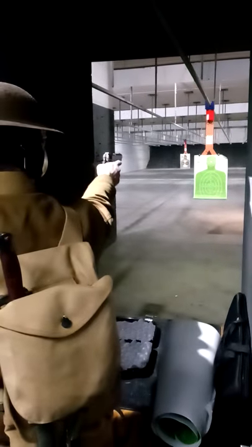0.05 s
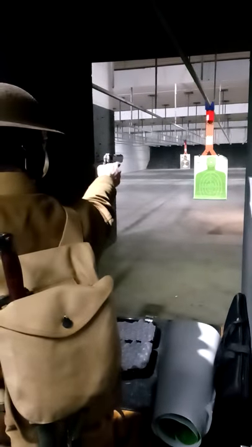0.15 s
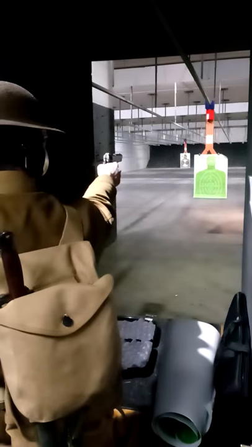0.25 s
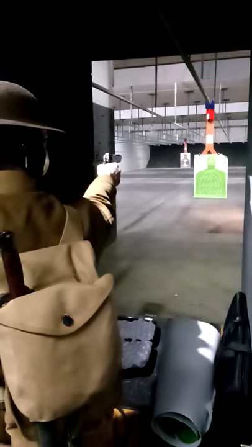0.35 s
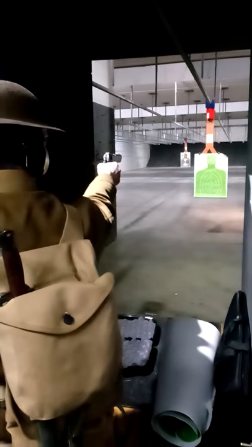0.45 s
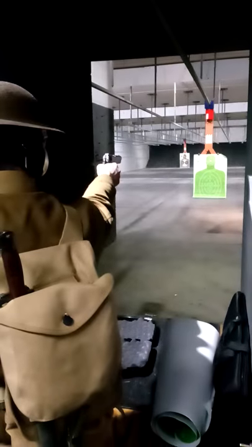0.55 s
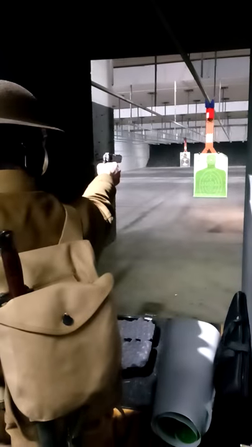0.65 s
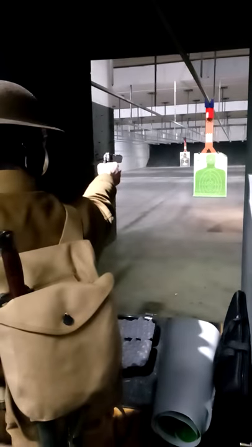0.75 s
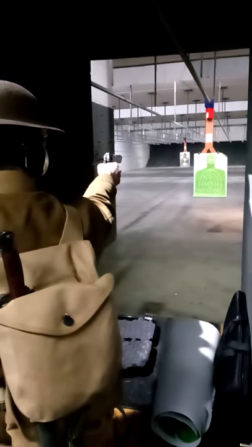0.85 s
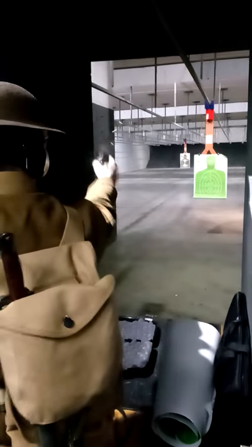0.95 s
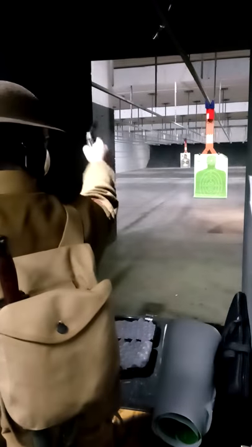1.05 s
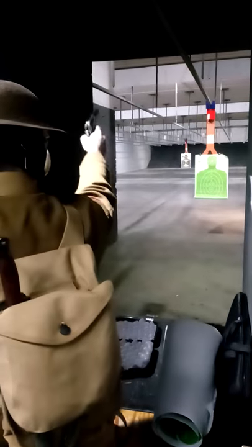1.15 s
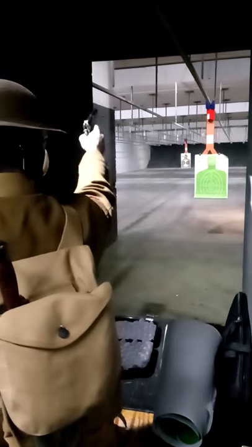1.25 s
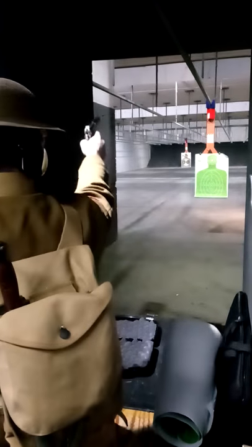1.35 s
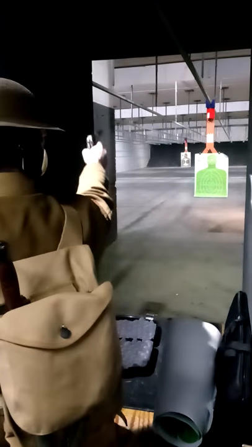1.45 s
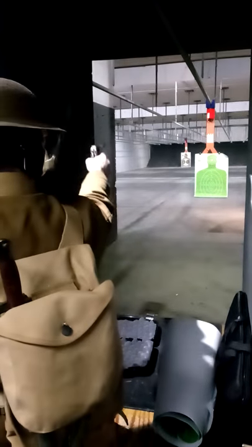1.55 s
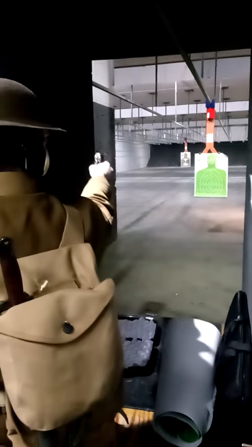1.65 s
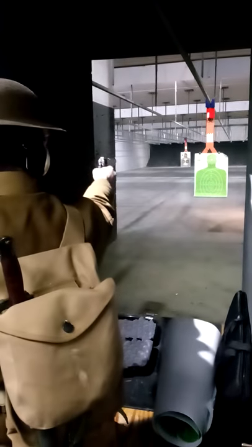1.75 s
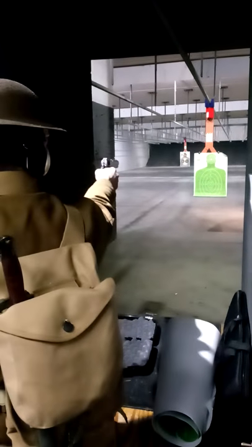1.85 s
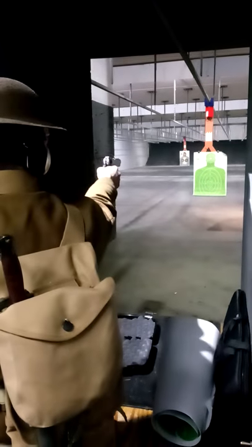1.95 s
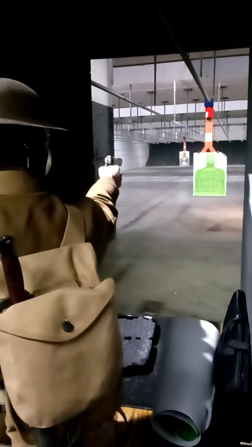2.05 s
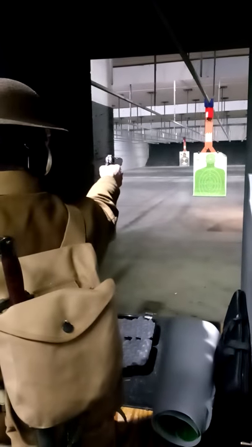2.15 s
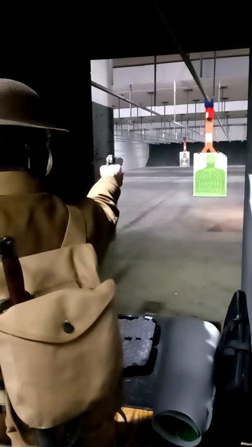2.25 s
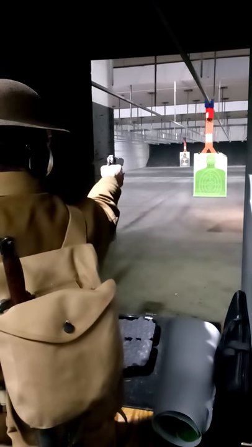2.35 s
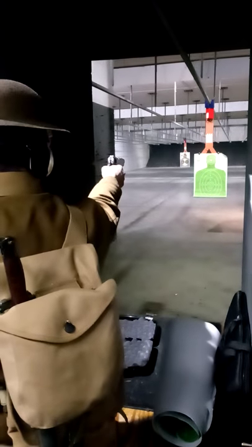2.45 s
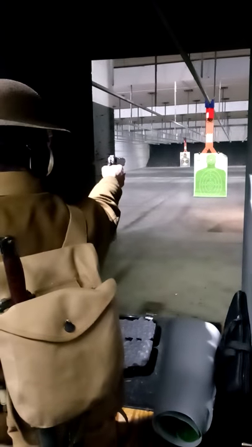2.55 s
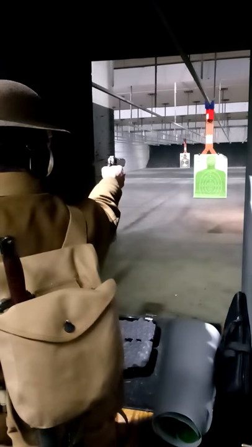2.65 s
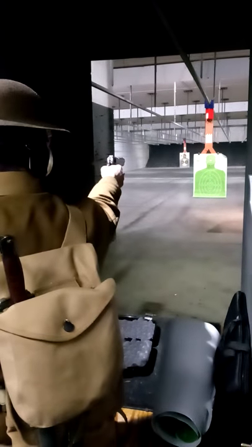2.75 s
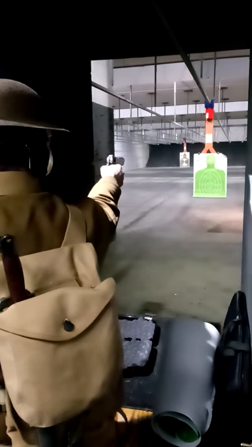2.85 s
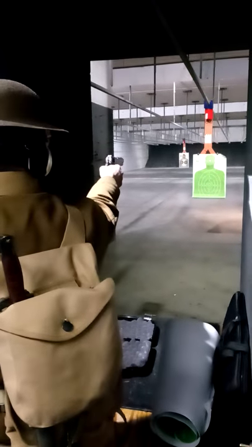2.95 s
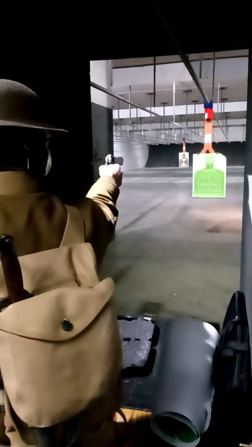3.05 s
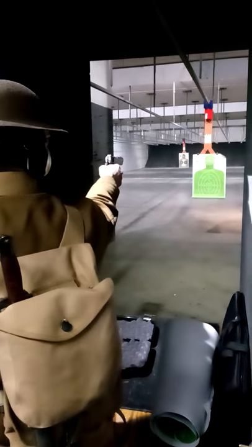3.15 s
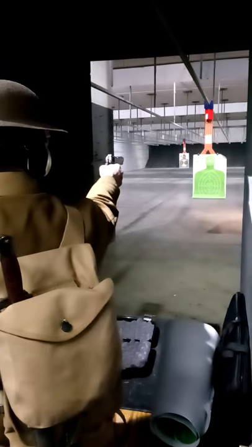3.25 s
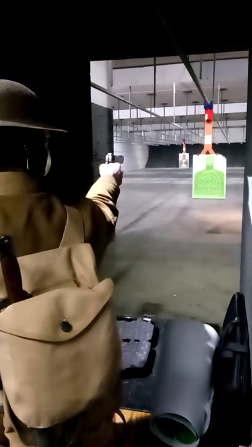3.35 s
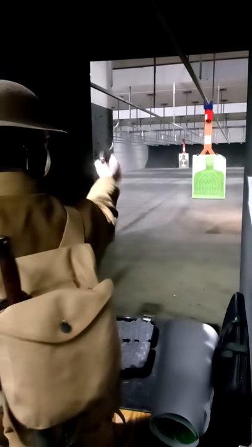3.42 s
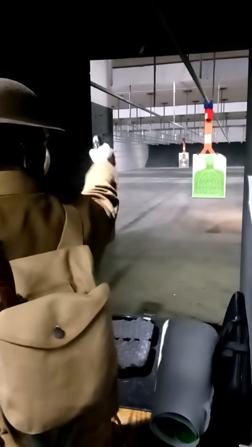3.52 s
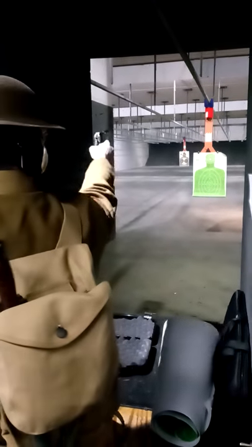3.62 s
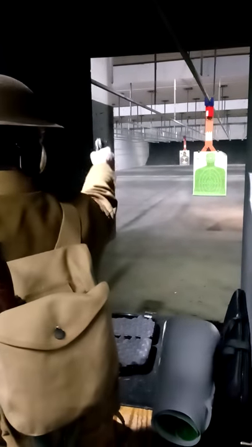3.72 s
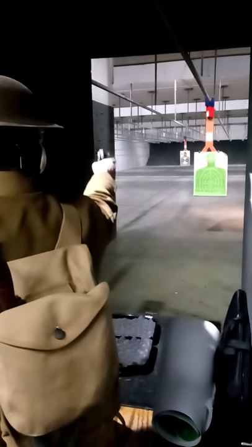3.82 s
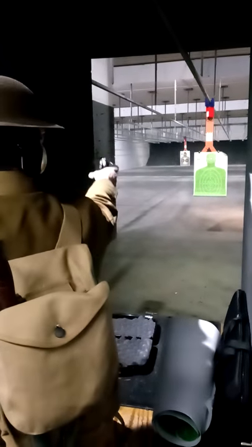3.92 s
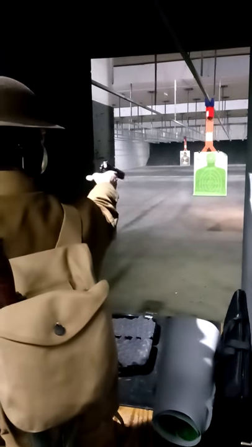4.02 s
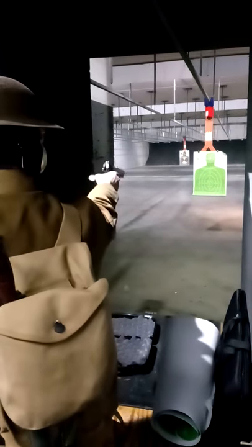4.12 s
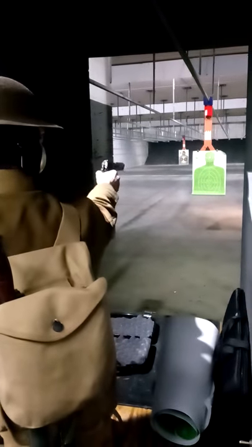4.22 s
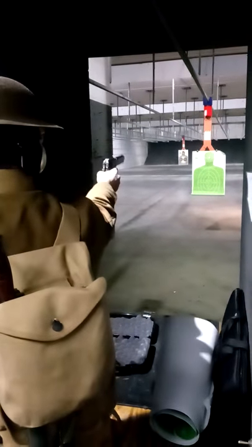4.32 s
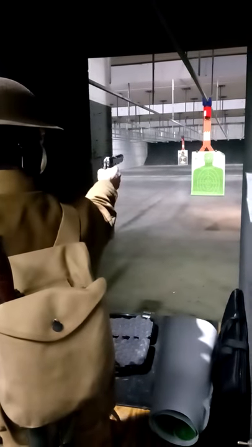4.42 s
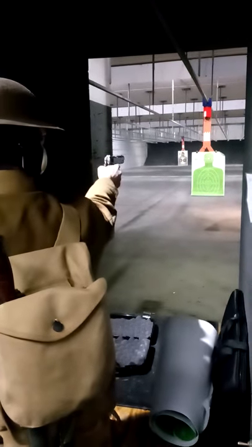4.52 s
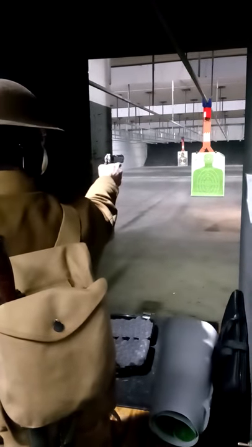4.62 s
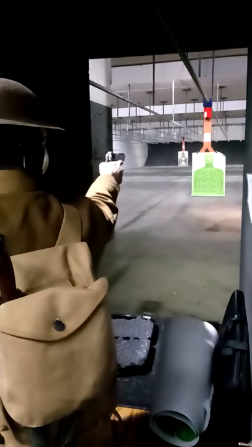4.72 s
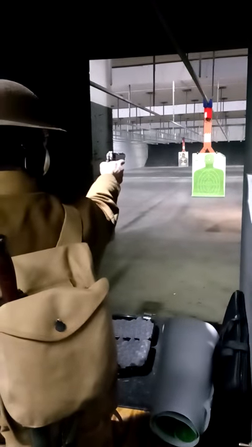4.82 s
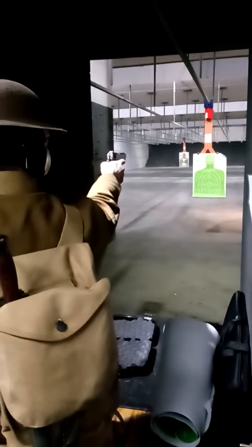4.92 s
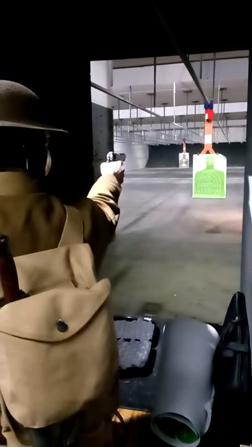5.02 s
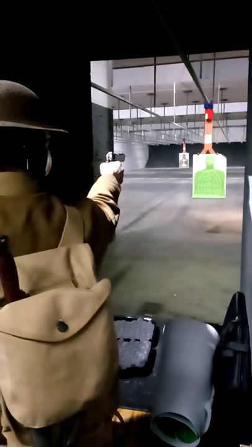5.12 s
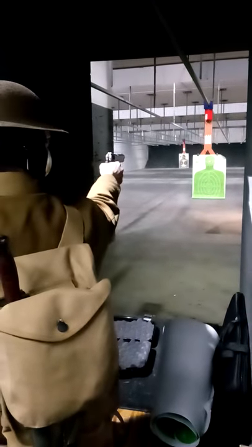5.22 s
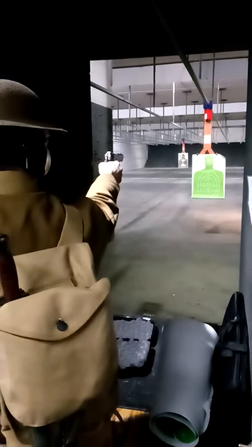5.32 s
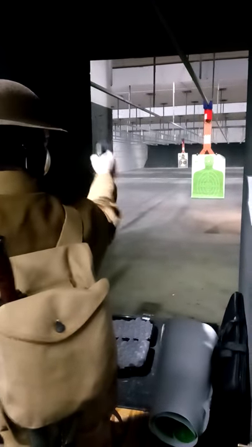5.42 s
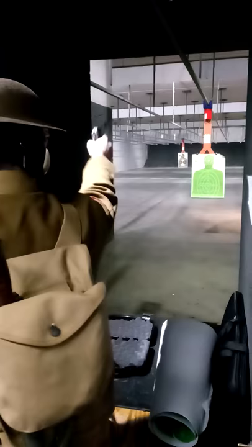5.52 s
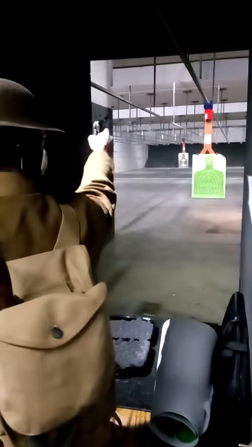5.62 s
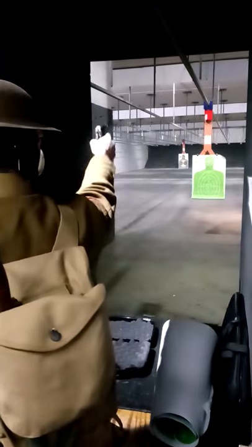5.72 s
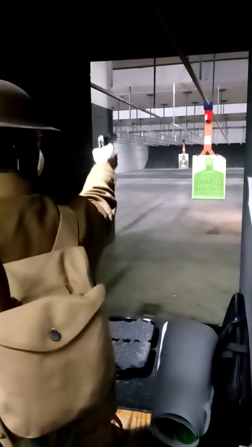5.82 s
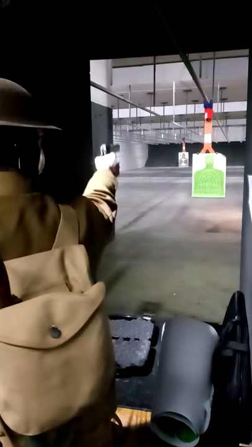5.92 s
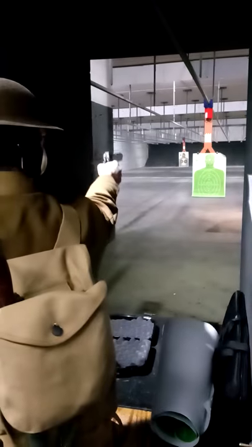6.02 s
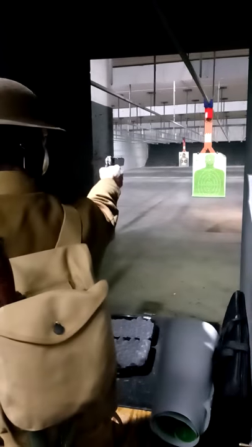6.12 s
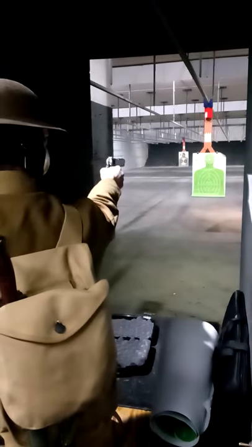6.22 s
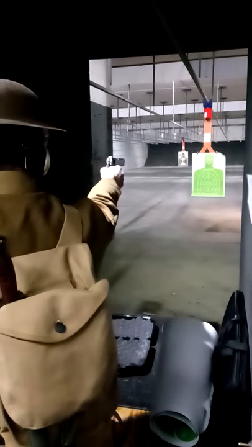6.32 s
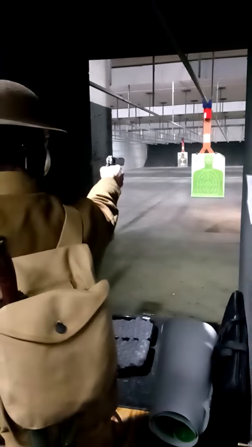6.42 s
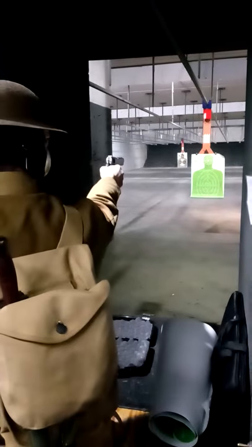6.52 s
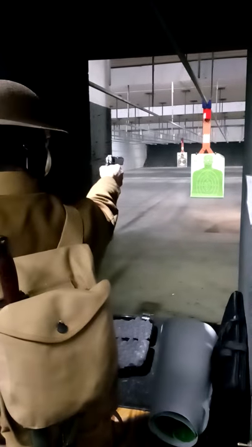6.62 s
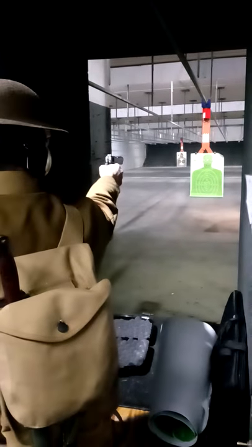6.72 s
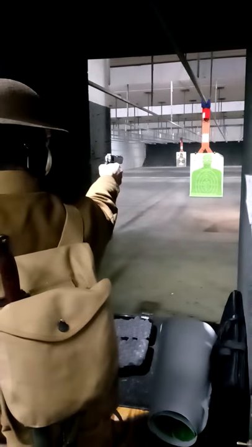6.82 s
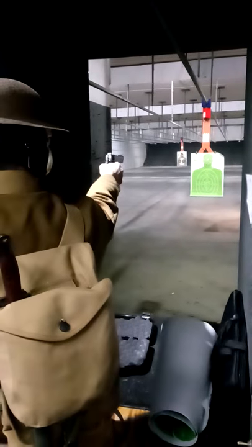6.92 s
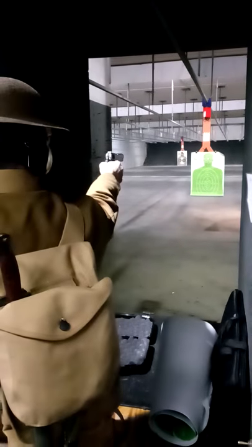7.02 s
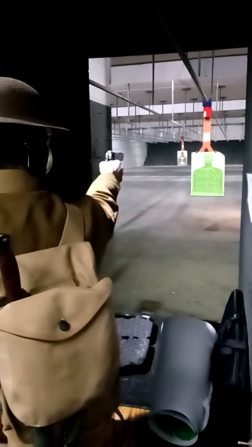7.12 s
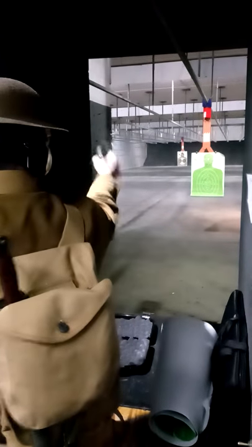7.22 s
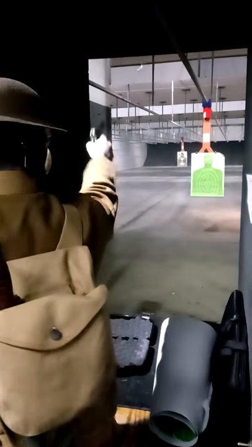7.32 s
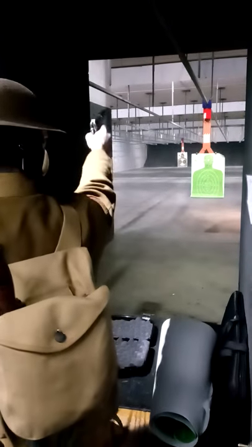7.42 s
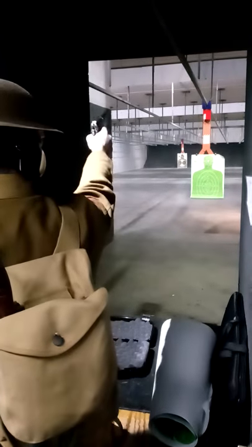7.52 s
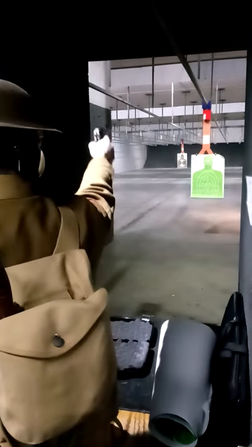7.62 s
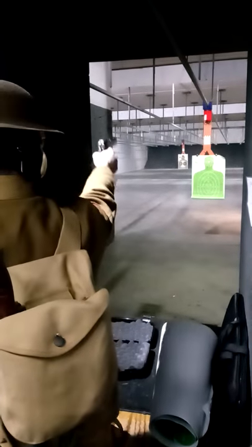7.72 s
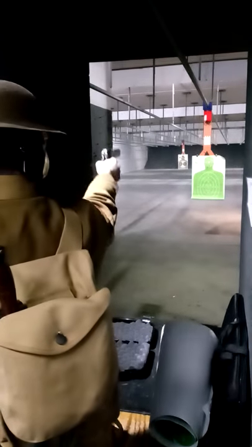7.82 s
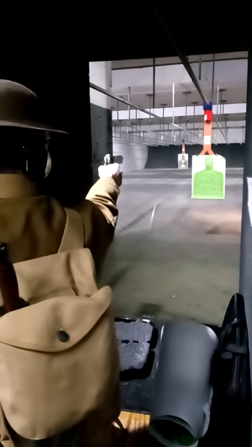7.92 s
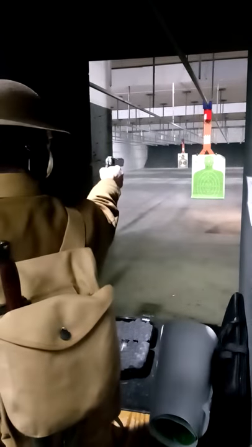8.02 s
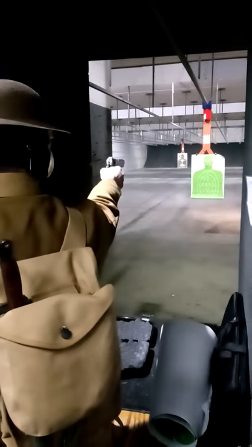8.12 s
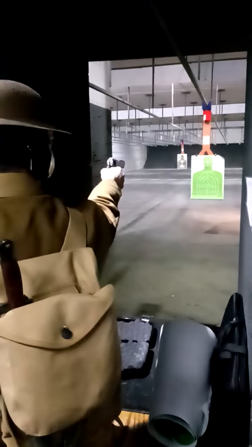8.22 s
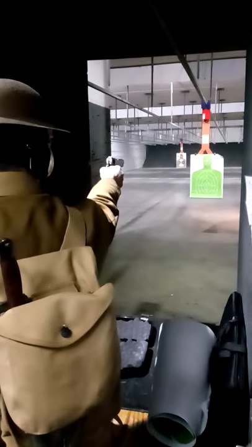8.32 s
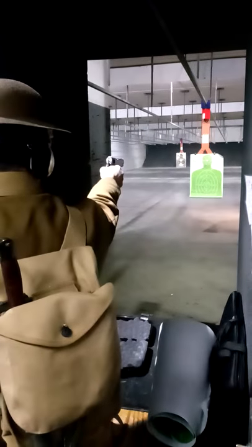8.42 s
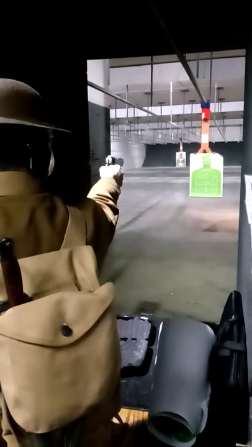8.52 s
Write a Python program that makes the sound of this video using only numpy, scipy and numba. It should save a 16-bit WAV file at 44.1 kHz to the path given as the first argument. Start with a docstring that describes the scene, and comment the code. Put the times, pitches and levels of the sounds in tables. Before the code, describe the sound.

Ventilation rushes low in an indoor shooting range, then a handgun close to the microphone fires four times at a steady pace. Every blast clips and briefly chokes the sound, followed by a deep thump and echoes rolling off hard walls. Other shooters, some next door and some distant, fill the gaps with their own echoing shots, along with small gun handling clicks and the light ring of brass landing.

```python
"""Ventilation rushes in a concrete indoor range; then a pistol fires four shots at arm's length.
Each muzzle blast cracks and its echoes pile up into a long roar. Other lanes fire in between,
spent brass ticks on the floor and gun parts click. Gain control rides the roar, the input clips,
and each close blast stalls the small microphone for a moment."""
import sys
import numpy as np
from scipy import signal
from scipy.fft import rfft, irfft, next_fast_len
from scipy.io import wavfile
from scipy.ndimage import map_coordinates
from numba import njit

SR = 44100
rng = np.random.default_rng(int(sys.argv[2]) if len(sys.argv) > 2 else 0)


def output_pcm(signal):
    """Save a mono or channel-first signal as 16-bit PCM at the path in sys.argv[1].

    Samples are clipped to [-1, 1] before scaling.
    """
    pcm = np.clip(np.atleast_2d(signal).T, -1, 1) * 32767
    wavfile.write(sys.argv[1], SR, np.round(pcm).astype(np.int16))


N = 377496

# noise spectra (frequency [Hz], density [dB])
DUCT_SPECTRUM = [(25, -7.5), (45, -18.5), (76, 0.5), (112, -4.5), (150, -0.5), (280, -11.5), (620, -15),
                 (1700, -12), (2600, -21), (4300, -28.5), (5600, -34.5), (6800, -56), (15000, -75.5)]
CLICK_SPECTRUM = [(500, -21.5), (2500, -17.5), (5000, 6.5), (7000, -2.5), (11000, -31), (16000, -44.5)]
SWELL_SPECTRUM = [(30, -34), (100, -17.5), (250, -14.5), (600, -7.5), (1300, -10.5), (1900, -8.5),
                  (2700, -11), (3600, -15.5), (5000, -11), (6500, -18), (16000, -56.5)]  # far shots
BLAST_SPECTRUM = [(30, -25), (100, -9), (250, -12.5), (800, 10), (1500, -2.5), (3300, -0.5), (5000, -9),
                  (7000, -11.5), (16000, -31)]  # muzzle gas, early reflections
ROAR_SPECTRUM = [(25, -14.5), (55, -23), (95, -4), (150, -8), (210, -4), (420, 0.5), (800, 0.5), (1050, -2),
                 (1400, -10.5), (2100, -12), (2700, -12), (3500, -13.5), (5000, -12.5), (6500, -17),
                 (16000, -54)]  # late echoes
BOOM_SPECTRUM = [(20, -2), (45, -4), (85, 2.5), (140, -10.5), (400, -47.5), (2000, -99.5)]  # deep thump after a shot
# hall decay (frequency [Hz], T60 [s])
HALL_DECAY = [(60, 2.09), (200, 1.724), (450, 1.843), (850, 1.67), (1500, 1.363), (2600, 1.31),
              (3800, 1.01), (5200, 0.72), (10000, 0.46)]
# booth and lane resonances (centre [Hz], width [Hz], lift [dB])
BOOTH_MODES = [(88, 15, -1), (309.5, 4.3, 4.5), (441, 4, 8), (817, 81, 1), (2670, 300, 3.5), (3390, 21, 6),
               (3730, 46, 3), (4120, 19, -3), (4490, 11, 5)]
# gun handling (time [s], level [dB], ring [Hz])
GUN_CLICKS = [(2.856, -17, 5320), (4.273, -13, 4800), (5.362, -22.5, 5300), (7.991, -17.5, 5630),
              (8.155, -7.5, 2680)]
# spent cases landing (time [s], level [dB])
CASE_DROPS = [(4.735, -2), (6.421, -9.5)]
# ring of a case (frequency [Hz], level [dB], T60 [s])
BRASS_MODES = [(6700, -2, 0.24), (11450, -28, .12)]
# shots far down the line (time [s], level [dB], swell time [s])
FAR_SHOTS = [(1.89, 41, 0.2), (6.66, 34, 0.28)]
# shots in the next lane (time [s], roar [dB], boom [dB])
NEXT_SHOTS = [(1.397, 42.5, 37), (2.884, 36, 11), (4.290, 37.5, 25), (7.032, 39.5, 10)]
# close shots (time [s], crack length [s], time the microphone comes free [s])
PISTOL_SHOTS = [(1.0027, .0011, 1.1475), (3.4735, .0022, 3.5944), (5.4551, .0011, 5.6087),
                (7.2685, .0016, 7.4205)]
# microphone response (frequency [Hz], gain [dB])
MIC_RESPONSE = [(30, -1.5), (3000, 2), (5000, -0.5), (6700, -8), (10000, 2.5), (16000, 1.5)]


def amp(db):
    """Decibels to gain."""
    return 10 ** (np.asarray(db) / 20)


def unit(x):
    """Scale to rms 1."""
    return x / np.sqrt(np.mean(x ** 2) + 1e-20)


def along(points, hz):
    """Interpolate (frequency [Hz], value) points on a log axis."""
    knots_hz, values = np.transpose(points)
    return np.interp(np.log(hz + 1), np.log(knots_hz + 1), values)


def since(at_s):
    """Seconds since at_s, zero before."""
    return np.maximum(np.arange(N) / SR - at_s, 0)


def add(track, at_s, sound):
    """Mix sound into track from at_s."""
    part = track[round(at_s * SR):][:len(sound)]
    part += sound[:len(part)]


def filtered(x, response):
    """Apply a gain given as a function of Hz."""
    size = next_fast_len(len(x) + 8192)
    return irfft(rfft(x, size) * response(np.fft.rfftfreq(size, 1 / SR)), size)[:len(x)]


def noise(spectrum, size):
    """Coloured noise, rms 1."""
    return unit(filtered(rng.standard_normal(size), lambda hz: amp(along(spectrum, hz))))


def resonance(x, centre_hz, width_oct, order):
    """One band of x, rms 1."""
    return unit(filtered(x, lambda hz: 1 / (1 + (np.log2((hz + 1) / centre_hz) / width_oct) ** order)))


def wobble(rate_hz, size):
    """Smooth random curve."""
    knots = rng.standard_normal(int(size * rate_hz / SR) + 4)
    return map_coordinates(knots, [np.arange(size) * rate_hz / SR])


def bump(t, width_s, at_s=0):
    """Gaussian, peak 1."""
    return np.exp(-((t - at_s) / width_s) ** 2)


def ventilation(level_db=-26.5):
    """Steady rush of duct air, no fine hiss."""
    return amp(level_db) * noise(DUCT_SPECTRUM, N)


def strike(ring, t, click_t60_s=0.08, rebound_s=0.031, rebound_db=-14.5):
    """Metal contact: a click plus the part's ring, then a weaker rebound."""
    contact = lambda: noise(CLICK_SPECTRUM, len(t)) * amp(-60 * t / click_t60_s) + ring()
    sound = contact()
    add(sound, rebound_s, amp(rebound_db) * contact())
    return sound


def gun_handling(width_oct=0.25, snap_db=3, snap_t60_s=0.07):
    """Parts snap into place; the hand damps them to a short, broad ring."""
    out, t = np.zeros(N), np.arange(SR // 2) / SR
    decay = amp(snap_db - 60 * t / snap_t60_s)
    for at_s, db, ring_hz in GUN_CLICKS:
        ring = lambda: resonance(rng.standard_normal(len(t)), ring_hz, width_oct, order=4) * decay
        add(out, at_s, amp(db) * strike(ring, t))
    return out


def spent_cases(detune=0.005):
    """Brass hits concrete; each mode is a close pair, so the ring beats."""
    out, t = np.zeros(N), np.arange(SR // 2) / SR
    split = lambda hz: hz * (1 + detune * rng.standard_normal(2))
    pair = lambda centre_hz: sum(np.sin(2 * np.pi * hz * t) for hz in split(centre_hz)) / 2
    ring = lambda: sum(amp(db - 60 * t / t60_s) * pair(hz) for hz, db, t60_s in BRASS_MODES)
    for at_s, db in CASE_DROPS:
        add(out, at_s, amp(db) * strike(ring, t))
    return out


def booth_gain(hz):
    """Booth and lane resonances colour the echoes."""
    return amp(sum(db / (1 + (2 * (hz - mode_hz) / width_hz) ** 2)
                   for mode_hz, width_hz, db in BOOTH_MODES))


def hall(spectrum, size=3 * SR, clump_db=0.77, clump_hz=25, wall_db=3):
    """Echoes of one shot arrive in clumps; the far wall returns a swell; treble dies first."""
    echoes = unit(filtered(noise(spectrum, size), booth_gain))
    echoes *= amp(clump_db * wobble(clump_hz, size))
    hz, t, bins = signal.stft(echoes, SR, nperseg=512)
    level_db = wall_db * bump(t, width_s=0.18, at_s=0.42) - 60 * t / along(HALL_DECAY, hz)[:, None]
    return signal.istft(bins * amp(level_db), SR, nperseg=512)[1][:size]


def boom(t, rise_s=0.016, t60_s=1.0):
    """A deep, low thump swells just after the shot and dies away."""
    return noise(BOOM_SPECTRUM, len(t)) * (1 - bump(t, rise_s)) * amp(-60 * t / t60_s)


def far_lane(high_hz=2650, low_hz=1800, sink_s=0.45, ring_db=3, ring_t60_s=0.64,
             rise_db=52, hiss_db=-14, hiss_t60_s=0.39, end_wall_db=3.5):
    """Far shots: thin hiss, then a swell with a sinking steely ring; the end wall returns it."""
    out, t = np.zeros(N), np.arange(3 * SR) / SR
    steel = lambda hz: resonance(noise(SWELL_SPECTRUM, len(t)), hz, width_oct=0.29, order=2)
    high_share = bump(t, sink_s)
    end_wall = amp(end_wall_db * bump(t, width_s=0.063, at_s=0.33))
    onset = 1 - np.exp(-t / 0.0045)
    for at_s, db, swell_s in FAR_SHOTS:
        ring = high_share * steel(high_hz) + np.sqrt(1 - high_share ** 2) * steel(low_hz)
        ring *= amp(ring_db - 60 * t / ring_t60_s)
        rise = amp(-rise_db * np.maximum(1 - t / swell_s, 0) ** 2.15)
        hiss = noise(CLICK_SPECTRUM, len(t)) * amp(hiss_db - 60 * t / hiss_t60_s)
        swell = amp(db) * (hall(SWELL_SPECTRUM, wall_db=1) + ring) * rise * end_wall
        add(out, at_s, (swell + hiss) * onset)
    return out


def next_lane(build_s=0.0087, early_t60_s=0.31, side_wall_db=3.5):
    """The partition blocks the direct blast; bright reflections build, then merge into the roar."""
    out, t = np.zeros(N), np.arange(3 * SR) / SR
    arrival = 1 - np.exp(-t / build_s)
    side_wall = amp(side_wall_db * bump(t, width_s=0.065, at_s=0.11))  # second surge
    for at_s, roar_db, boom_db in NEXT_SHOTS:
        early_db = 48.5 + 1.7 * (roar_db - 40)  # stronger shots are brighter
        early = noise(BLAST_SPECTRUM, len(t)) * amp(early_db - 60 * t / early_t60_s) * arrival ** 3
        roar = amp(roar_db) * hall(ROAR_SPECTRUM) * arrival
        add(out, at_s, side_wall * (early + roar + amp(boom_db) * boom(t, rise_s=0.059)))
    return out


def pistol(crack_hz=2300, crack_db=38, crack_t60_s=0.051, bite_hz=5000, bite_db=-7,
           gas_db=-1, roar_db=44, build_s=0.027, boom_db=39):
    """The muzzle blast rings two modes of the microphone port; echoes pile up into a roar."""
    out, t = np.zeros(N), np.arange(3 * SR) / SR
    port = np.sin(2 * np.pi * crack_hz * t) + amp(bite_db) * np.sin(2 * np.pi * bite_hz * t)
    for at_s, *_ in PISTOL_SHOTS:
        gas = amp(gas_db) * noise(BLAST_SPECTRUM, len(t))
        crack = (port + gas) * amp(crack_db - 60 * t / crack_t60_s)
        roar = amp(roar_db) * hall(ROAR_SPECTRUM) * (1 - bump(t, build_s))
        add(out, at_s, crack + roar + amp(boom_db) * boom(t))
    return out


@njit
def follow(target, attack_samples, release_samples):
    """One-pole follower, separate rise and fall times."""
    out, now = np.empty(len(target)), 0.0
    for i in range(len(target)):
        now += (target[i] - now) / (attack_samples if target[i] > now else release_samples)
        out[i] = now
    return out


def gain_control(x, knee_db=-23, slope=0.7, attack_s=0.025, release_s=0.09):
    """Loud sound turns the gain down, slightly late; the roar seems to hang on."""
    power = signal.lfilter(*signal.butter(1, 20, fs=SR), x ** 2)
    excess_db = np.maximum(10 * np.log10(np.abs(power) + 1e-12) - knee_db, 0)
    return x * amp(-follow(slope * excess_db, attack_s * SR, release_s * SR))


def input_clip(x, limit=0.7, coupling_hz=35):
    """Clipped peaks crackle; the coupling filter tilts their flat tops."""
    return signal.lfilter(*signal.butter(1, coupling_hz, "highpass", fs=SR), np.clip(x, -limit, limit))


def thump(at_s, ring_hz=90, ring_t60_s=0.065, spike_s=0.00022):
    """A diaphragm jump rings the input's bass filter."""
    t = since(at_s)
    spike = 0.34 * np.exp(-t / spike_s)
    ring = 0.24 * np.cos(2 * np.pi * ring_hz * t) * amp(-60 * t / ring_t60_s)
    return (t > 0) * (spike + ring)


def mic_stall(x, deep_db=-49, shallow_db=-23, dull_hz=4800, recovery_s=0.024,
              echo_s=0.019, jolt_db=-7, tick_db=-26, tick_t60_s=0.063):
    """Each close blast pins the diaphragm: dull near silence, a pop on release, a sputtering return."""
    jumps = np.zeros(N)
    sputter = np.abs(noise([(100, -6.5), (900, 11.0), (3000, -30.5), (16000, -71)], N))
    dull = filtered(x, lambda hz: 1 / (1 + (hz / dull_hz) ** 6))
    for at_s, crack_s, free_s in PISTOL_SHOTS:
        pinned_s = since(at_s + crack_s)
        leak = amp(deep_db + (shallow_db - deep_db) * np.minimum(pinned_s / (free_s - at_s), 1) ** 2)
        recovered = np.minimum(since(free_s) / recovery_s, 1)
        opening = np.clip(recovered + 3 * sputter * recovered - 3 * (1 - recovered), 0, 1)
        # the first wall echo jolts the pinned diaphragm and lets ticks through
        echo_age_s = since(at_s + echo_s)
        ticks = x * np.maximum(sputter - 0.7, 0) * amp(tick_db - 60 * echo_age_s / tick_t60_s)
        jolt = np.minimum(echo_age_s / 0.0034, 1) * (amp(jolt_db) * thump(at_s + echo_s) + ticks)
        jumps += thump(free_s) - thump(at_s + crack_s) + jolt
        x = np.where(pinned_s > 0, opening * x + (1 - opening) * leak * dull, x)
    return x + jumps


def scene():
    """All lanes, brass, gun handling and air; mono."""
    return (pistol() + next_lane() + far_lane() + spent_cases() + gun_handling() + ventilation())[None]


def record(dry, hiss_db=-83, top_hz=15900):
    """Gain control, clipping, stall, preamplifier hiss, microphone colour, band limit."""
    x = mic_stall(input_clip(gain_control(dry[0])))
    x += amp(hiss_db) * rng.standard_normal(N)
    band = lambda hz: 1 / (1 + (hz / top_hz) ** 200)
    return filtered(x, lambda hz: amp(along(MIC_RESPONSE, hz)) * band(hz))[None]


dry = scene()
out = record(dry)
output_pcm(out)
```